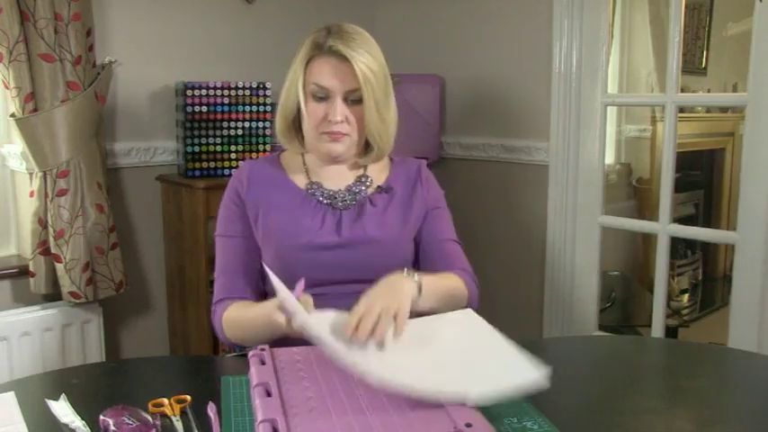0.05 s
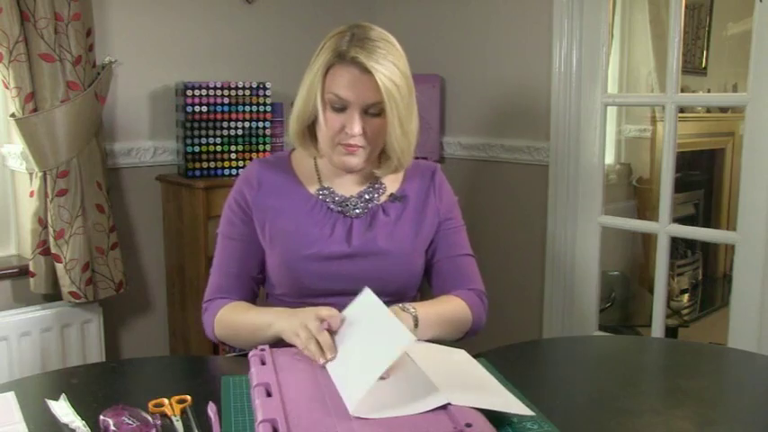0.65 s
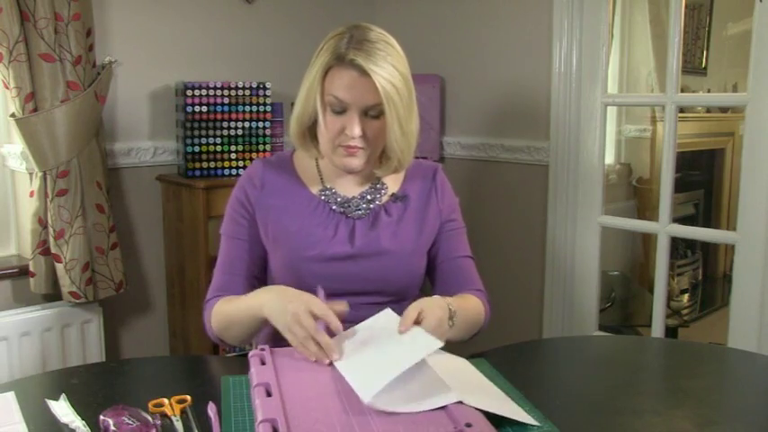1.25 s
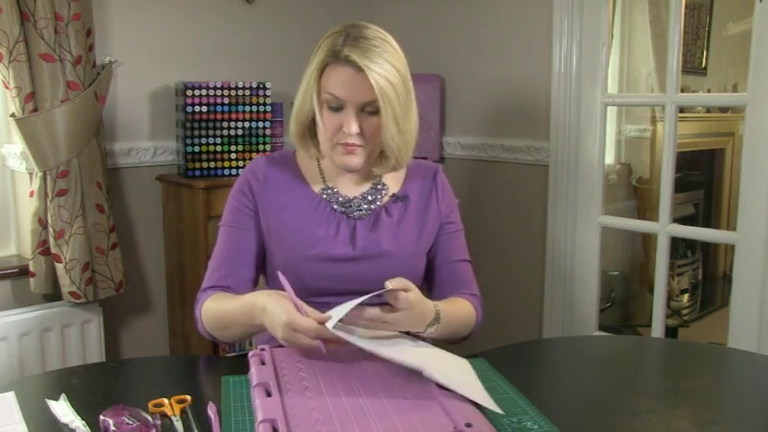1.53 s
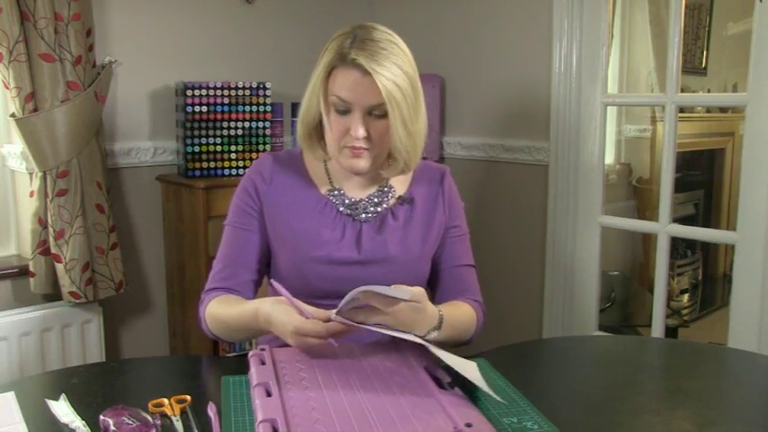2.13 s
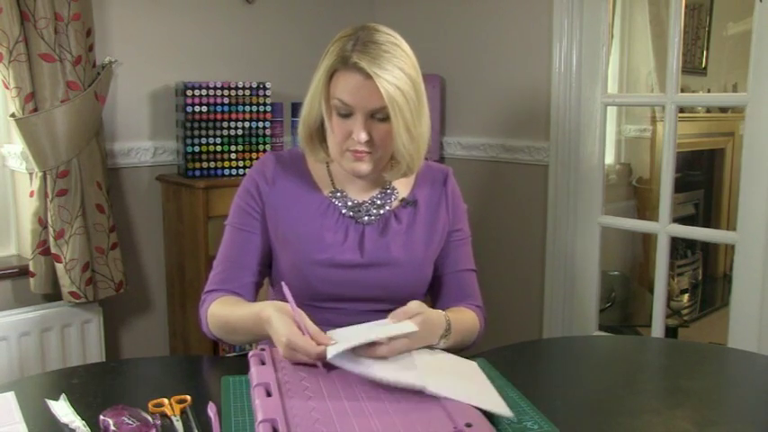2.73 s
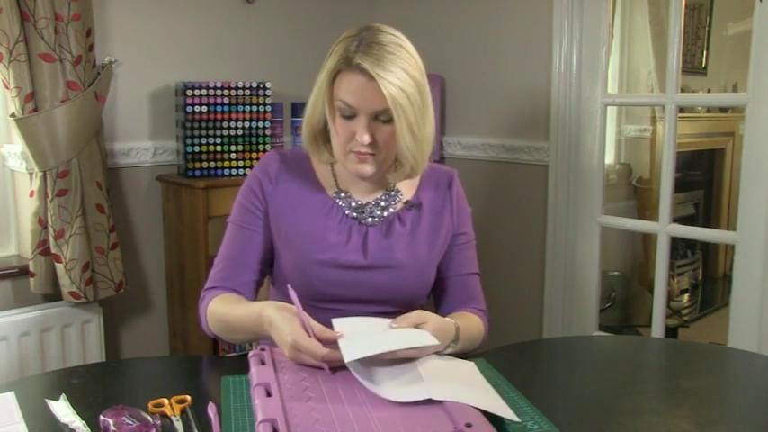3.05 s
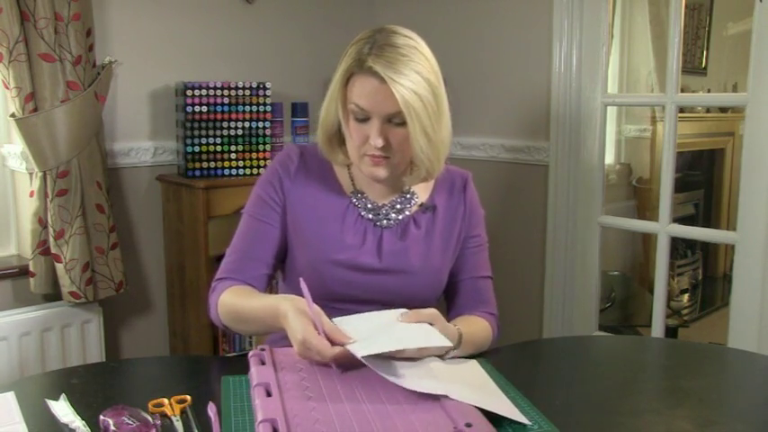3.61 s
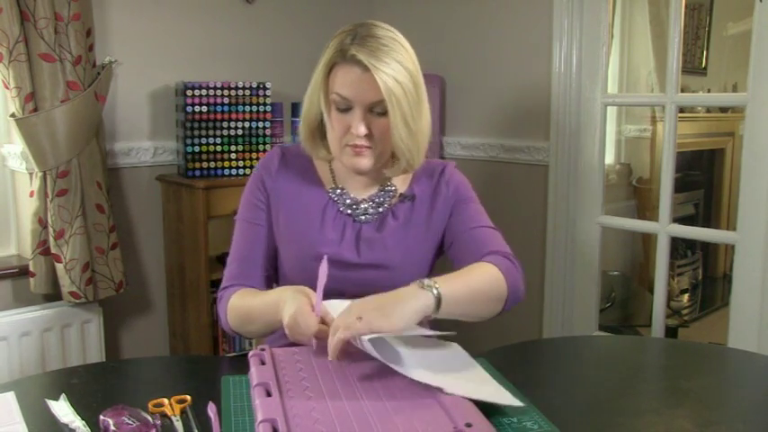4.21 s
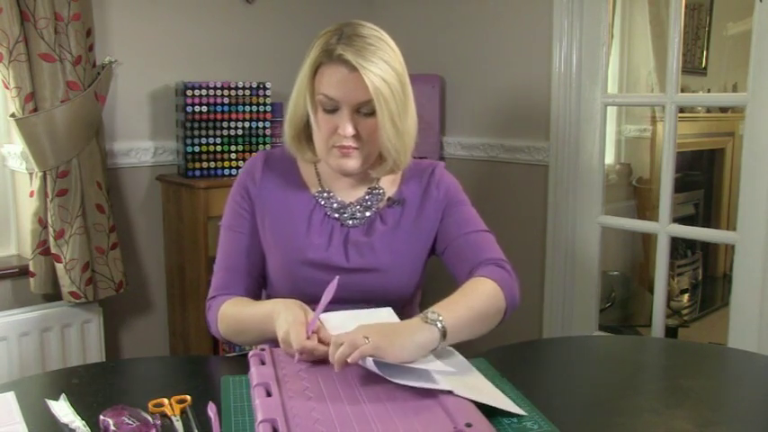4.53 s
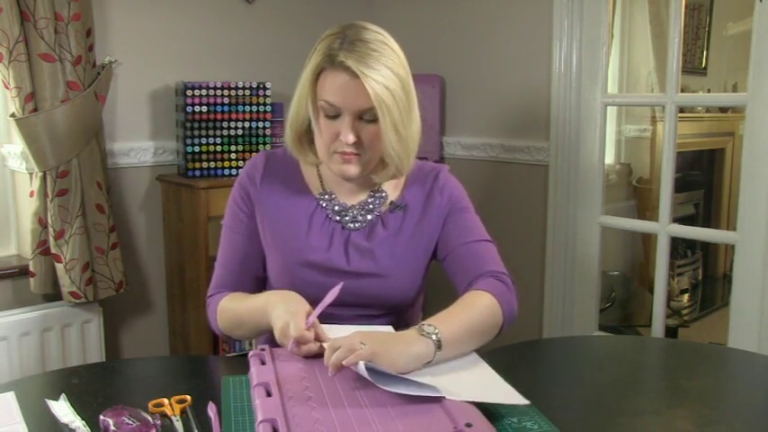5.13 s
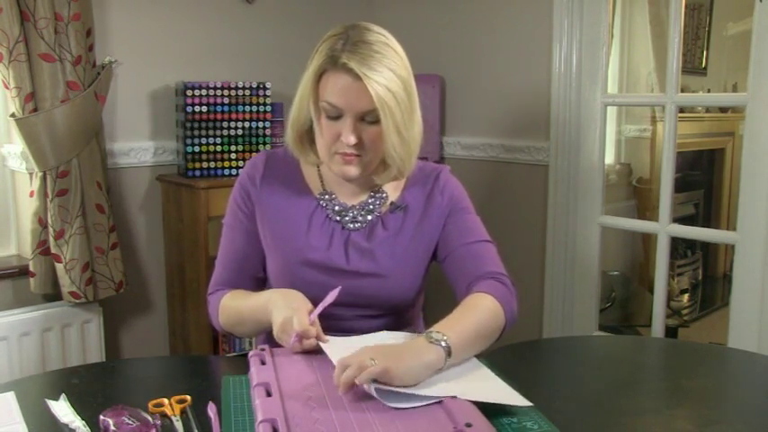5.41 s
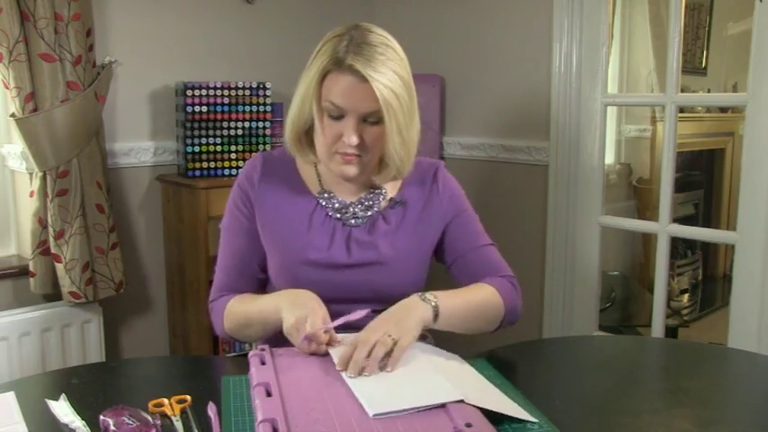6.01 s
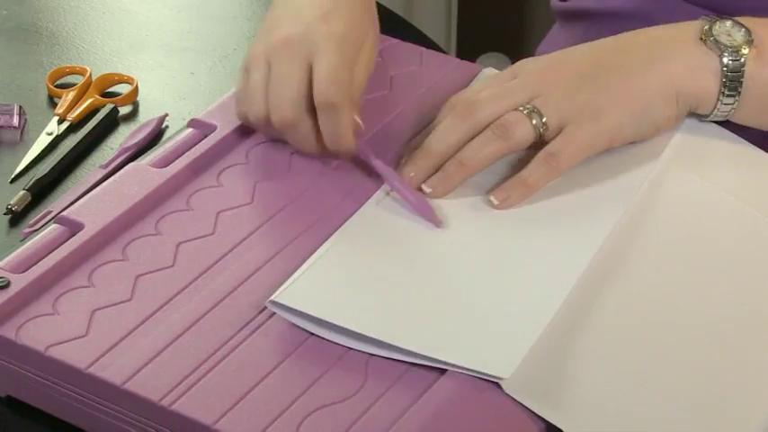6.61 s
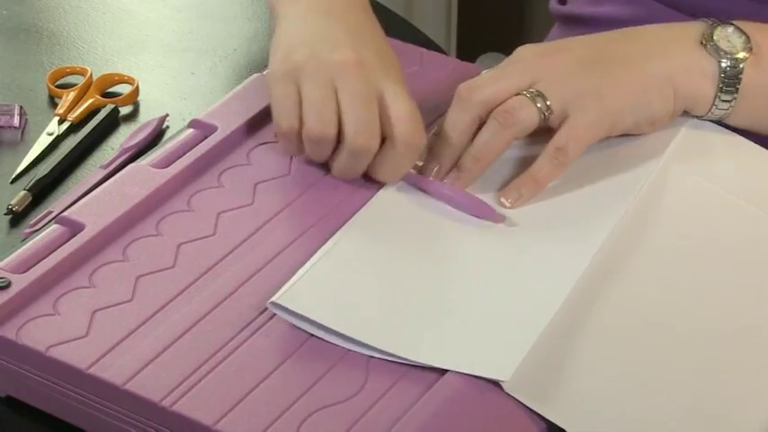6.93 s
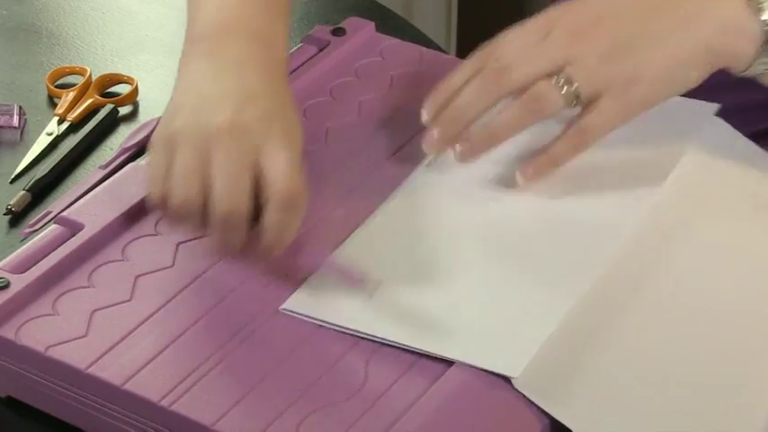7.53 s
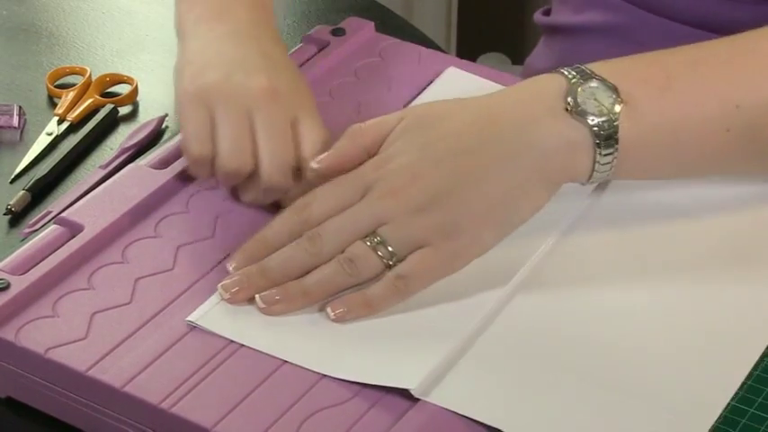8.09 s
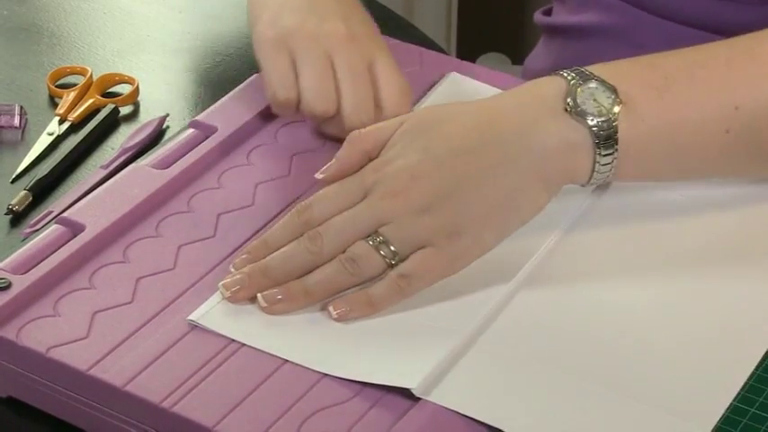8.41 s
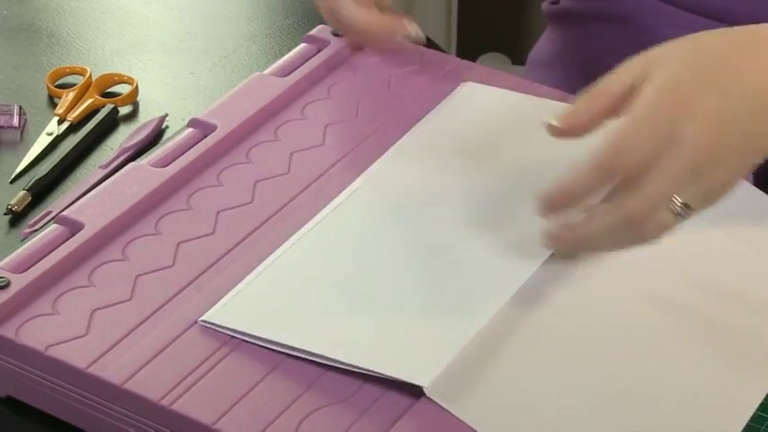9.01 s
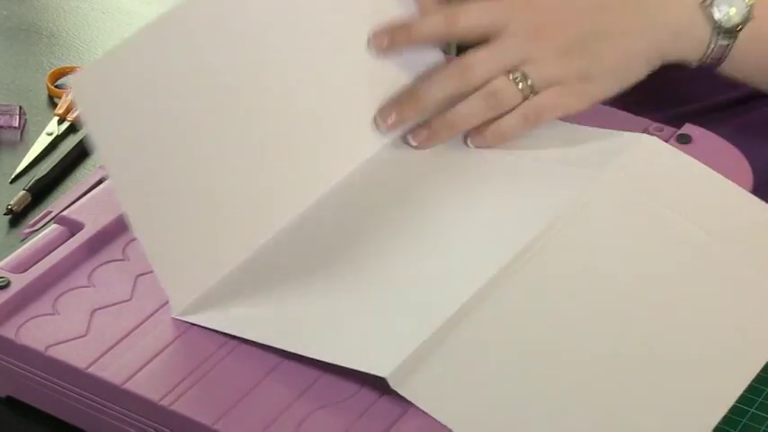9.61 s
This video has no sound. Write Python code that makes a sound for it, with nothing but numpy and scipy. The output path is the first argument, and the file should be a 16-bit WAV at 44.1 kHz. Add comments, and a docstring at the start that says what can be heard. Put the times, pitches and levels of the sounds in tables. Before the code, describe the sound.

A large sheet of stiff paper flops onto a plastic board with a low wobble. It rustles, ticks and hisses as it is bent over and lined up, with dull taps against the board. A plastic tool then rubs the crease in three strokes, a palm brushing the fold after the first, and slips off with a sharp clack. The sheet flexes again. It is heard close up in a small, quiet room.

```python
"""Folding and creasing stiff card

A large sheet is laid on a plastic scoring board, bent over and lined up in a small living room.
It rumbles as it flexes, rustles and ticks as it bends, hisses as it slides and flops on the board.
A plastic folding tool rubs the crease down in three strokes and slips off the edge with a clack;
a palm brushes the fold after the first. Rubs are tiny slips of fibres, hits are a push and a dying
chatter, and all of them ring the board. Close up, in mono."""
import sys
import numpy as np
from scipy import signal
from scipy.fft import rfft, irfft, next_fast_len
from scipy.io import wavfile
from scipy.ndimage import uniform_filter1d, map_coordinates

SR = 44100
rng = np.random.default_rng(int(sys.argv[2]) if len(sys.argv) > 2 else 0)


def transcribe(u):
    """Save the signal u as a 16-bit wav file named by the first command-line argument.

    u: samples, shape (n,) or (channels, n), limited to [-1, 1]; the rate is SR.
    q: integer samples, one column per channel.
    """
    v = np.clip(np.atleast_2d(u).T, -1, 1)
    q = np.round(v * 32767).astype(np.int16)
    wavfile.write(sys.argv[1], SR, q)


N = 430107
TOP_HZ = 15850


def amp(db):
    """Decibels to gain."""
    return 10 ** (np.asarray(db) / 20)


def unit(x):
    """Scale to rms 1."""
    return x / np.sqrt(np.mean(x ** 2) + 1e-20)


def along(points, hz):
    """Read (Hz, value) points on a log frequency axis."""
    freqs, values = np.transpose(points)
    return np.interp(np.log(hz + 1), np.log(freqs + 1), values)


def below(hz, edge_hz, order=3):
    """Low-pass gain."""
    return 1 / np.sqrt(1 + (hz / edge_hz) ** (2 * order))


def above(hz, edge_hz, order=3):
    """High-pass gain."""
    return below(edge_hz, hz + 1, order)


def add(track, s, x):
    """Mix x into the track at s seconds."""
    part = track[max(round(s * SR), 0):][:len(x)]
    part += x[:len(part)]


def filtered(x, response):
    """EQ a whole track with a frequency response."""
    size = next_fast_len(N + SR // 2)
    return irfft(rfft(x, size) * response(np.fft.rfftfreq(size, 1 / SR)), size)[:N]


def coloured(x, gain, size=4096):
    """Minimum-phase EQ, so that attacks stay sharp."""
    cepstrum = irfft(np.log(np.maximum(gain(np.fft.rfftfreq(size, 1 / SR)), 1e-6)))
    cepstrum[1:size // 2] *= 2
    cepstrum[size // 2 + 1:] = 0
    return signal.fftconvolve(x, irfft(np.exp(rfft(cepstrum))))[:len(x)]


def drift(rate):
    """A smooth random curve with rate knots a second."""
    knots = rng.standard_normal(int(N * rate / SR) + 4)
    return map_coordinates(knots, [np.arange(N) * rate / SR])


def arch(length, crest, power):
    """A hand's stroke: it gathers speed up to the crest, then slows to a stop."""
    progress = np.linspace(0, 1, round(length * SR))
    ramp = np.interp(progress, [0, np.clip(crest, 0.05, 0.95), 1], [0, 1, 0])
    return np.sin(np.pi / 2 * ramp) ** abs(power)


def friction(gain, rate, spread_db, smooth):
    """Fibres catch and let go: about rate uneven slips a second over a smooth rub, rms 1."""
    slips = (rng.random(N) < rate / SR) * rng.choice([-1, 1], N)
    sizes = amp(spread_db * np.clip(rng.standard_normal(N), -2, 2))
    return unit(coloured(unit(slips * sizes) + smooth * rng.standard_normal(N), gain))


def contact(t60, chatter):
    """One push, followed by a dying chatter of the card against its support."""
    t = np.arange(SR // 4) / SR
    tail = rng.standard_normal(len(t)) * amp(-60 * t / max(t60, .003))
    return (t == 0) + chatter * tail / np.linalg.norm(tail)


def patchy(x, depth_db, bands=5, frames=12):
    """As the sheet bends its resonances shift: patches of random gain in time and frequency."""
    spectra = signal.stft(x, nperseg=512)[2]
    patches = uniform_filter1d(rng.standard_normal(spectra.shape), bands, axis=0)
    patches = uniform_filter1d(patches, frames, axis=1)
    return unit(signal.istft(spectra * amp(depth_db * unit(patches)), nperseg=512)[1][:N])


def spot(depth_db, count=30):
    """A random EQ: each spot on the sheet favours its own resonances."""
    points = np.transpose([np.geomspace(200, TOP_HZ, count), rng.standard_normal(count)])
    return lambda hz: amp(depth_db * along(points, hz))


# Colour of the still room: (frequency [Hz], level [dB])
ROOM_TONE = [(15, -15), (25, 6), (144, -6.5), (204, -5), (340, -4), (537, -11.5), (666, -3), (762, -16),
             (2120, -20), (15500, -30.5)]
def room_tone():
    """A faint, steady bed of bass-heavy noise."""
    return amp(-63.5) * unit(filtered(rng.standard_normal(N), lambda hz: amp(along(ROOM_TONE, hz))))


# Colour of the handled sheet: (frequency [Hz], level [dB])
CARD_EQ = [(24, -28), (40, -0.5), (253, 1), (287, -7), (427, -0.5), (509, -4), (859, -1), (949, -2.5),
           (1130, -2), (1860, -11), (6810, -19), (15500, -29)]
def card(hz):
    """The sheet's voice, shared by its rumble, rustle and hiss."""
    return amp(along(CARD_EQ, hz))


# Wobbles of the whole sheet: (time [s], relative level [dB])
WOBBLES = [(0.005, -45), (0.16, -44.5), (0.28, -53), (0.93, -47.5), (1.37, -55), (1.62, -49.5), (1.8, -57),
           (2.15, -50.5), (2.9, -55), (4.1, -55), (4.29, -45.5), (5.02, -46.5), (5.16, -52), (5.9, -54),
           (7.27, -49), (7.83, -45), (8.94, -55), (9.59, -46), (9.67, -52)]
def flexing(bend, attack_s=0.01, t60=0.36):
    """The sheet rumbles with each wobble, and a little under every bend."""
    wobble, t = np.zeros(N), np.arange(SR // 2) / SR
    for s, db in WOBBLES:
        add(wobble, s - attack_s, np.minimum(t / attack_s, 1) * amp(db - 60 * t / t60))
    swell = np.hypot(wobble, amp(-9) * bend)
    rumble = friction(lambda hz: card(hz) * below(hz, 190, order=2), rate=60, spread_db=-4, smooth=1.17)
    return amp(-1.3) * swell * patchy(rumble, depth_db=-0.5, bands=2)


# Dull blows of card, fingers and tool on the board:
# (time [s], relative level [dB], centre [Hz], t60 [s], thud against the blow [dB])
KNOCKS = [(0.108, -26, 710, 0.19, -16), (0.388, -46.5, 557, 0.036, -22), (0.851, -38.5, 496, 0.21, -9),
          (1.172, -36.5, 397, 0.14, -7), (1.362, -34.5, 227, 0.12, -9), (2.129, -36, 241, 0.06, -20),
          (2.371, -38.5, 422, 0.057, -10), (2.519, -36.5, 327, 0.1, 1), (2.703, -28, 650, 0.018, -19),
          (2.766, -28, 960, 0.05, -5), (2.782, -21.5, 910, 0.025, -6.5), (2.895, -45.5, 199, 0.08, -13),
          (3.06, -36, 450, 0.12, -13), (3.751, -21.5, 840, 0.041, 5.5), (3.802, -23, 750, 0.097, -5),
          (3.812, -15, 930, 0.072, -13), (4.551, -34.5, 228, 0.065, -15), (4.618, -28, 424, 0.092, -2),
          (5.018, -36, 463, 0.041, -28), (6.165, -23.5, 594, 0.12, -19.5), (7.453, -17, 699, 0.14, -22),
          (7.489, -26, 660, 0.1, -30), (7.817, -25.5, 560, 0.15, -23), (8.078, -30, 1150, 0.053, -11),
          (8.321, -33, 750, 0.08, -24), (8.712, -16, 650, 0.17, -23), (8.729, -10, 1430, 0.24, -23),
          (8.757, -12, 744, 0.1, -22.5), (9.558, -33, 393, 0.053, -4.5), (9.577, -32.5, 494, 0.16, -9)]
def knocks():
    """Soft, broad contacts ring a low resonance of sheet and board, and thud in the table."""
    out = np.zeros(N)
    for s, db, centre_hz, t60, thud_db in KNOCKS:
        hollow = lambda hz: 1 + 0.54 / (1 + (9 * (hz / centre_hz - 1)) ** 2)
        band = lambda hz: below(hz, 1.38 * centre_hz) * above(hz, 0.8 * centre_hz)
        edge = lambda hz: amp(-35) * above(hz, 2 * centre_hz) * below(hz, 5 * centre_hz)
        thud = lambda hz: amp(thud_db) * above(hz, 35) * below(hz, 360)
        colour = lambda hz: hollow(hz) * band(hz) + edge(hz) + thud(hz)
        knock = coloured(contact(t60, chatter=10.5), colour)
        add(out, s, amp(db + 18.5) * knock / np.linalg.norm(knock))
    return out


# Colour of a sharp card contact: (frequency [Hz], level [dB])
CRACK_EQ = [(60, -22.5), (250, -1.5), (500, 7.5), (1200, 5), (2000, -4), (3300, -6), (8000, -19),
            (15000, -32.5)]
def crack(tilt):
    """Colour of a sharp card click, tilted brighter or duller in dB per octave, with little bass."""
    return lambda hz: amp(along(CRACK_EQ, hz) + tilt * np.log2((hz + 100) / 1500)) * above(hz, 313)


# Sharp clicks and cracks of the card: (time [s], relative level [dB], tilt [dB/octave])
SNAPS = [(0.109, -23, -4.5), (0.163, -27.5, 2), (0.184, -28, 5.5), (0.455, -45, -6), (0.48, -39, -4.5),
         (0.679, -37, -4), (0.85, -24.5, -0.5), (1.17, -34.5, 4), (1.3, -33, -1.5), (1.554, -35.5, 2),
         (1.599, -28, 2.5), (1.632, -29.5, -3), (2.062, -36, -4.5), (2.252, -30.5, -1), (2.335, -37.5, 0),
         (2.369, -30, 0), (2.455, -37.5, 3), (2.517, -29, -1), (2.524, -27, 0), (2.697, -25.5, -1),
         (2.738, -23, -2), (2.782, -25, 3.5), (3.191, -33, 0.5), (3.432, -46.5, 5), (3.571, -33.5, -1),
         (3.817, -13.5, -2.5), (3.907, -30, -2), (3.989, -29, 1.5), (4.047, -29, 1.5), (4.1, -33.5, 1.5),
         (4.18, -36.5, -6), (4.238, -32.5, -0.5), (4.42, -37, 2.5), (4.455, -31.5, 0), (4.618, -27, -5),
         (4.849, -28, 2.5), (4.965, -34, 1.5), (5.143, -35.5, 3.5), (5.159, -31.5, 3.5), (5.395, -29.5, 1),
         (5.415, -29.5, 3), (6.162, -26.5, 5.5), (6.621, -40.5, 0), (6.657, -32.5, 2.5), (7.846, -31, 5.5),
         (8.078, -21.5, 0.5), (8.727, -15.5, 4.5), (8.736, -14.5, 2.5), (8.755, -14.5, -4.5),
         (9.139, -40, 4), (9.32, -35.5, -0.5), (9.557, -31, 3.5), (9.681, -31.5, -3.5)]
def snaps():
    """Edges click on the board and the bent card buckles."""
    out = np.zeros(N)
    for s, db, tilt in SNAPS:
        place = spot(depth_db=3)
        # a light tick buckles only a small patch of card, which rings high
        light = np.clip((-23.5 - db) / 12, 0, 1)
        presence = lambda hz: 1 + 0.81 * light / (1 + (2 * np.log2((hz + 1) / 3000)) ** 2)
        colour = lambda hz: crack(tilt)(hz) * place(hz) * presence(hz)
        snap = coloured(contact(t60=0.028, chatter=1.27), colour)
        add(out, s, amp(db + 11.5) * snap / np.linalg.norm(snap))
    return out


# The hands bend the card: (start [s], length [s], relative level [dB])
BENDS = [(0.13, 0.15, -54), (0.681, 0.12, -64), (0.853, 0.07, -50), (0.977, 0.09, -58), (1.164, 0.1, -55.5),
         (1.344, 0.13, -52), (1.548, 0.1, -52), (1.738, 0.26, -58), (2.026, 0.07, -51), (2.157, 0.02, -55),
         (2.363, 0.05, -55), (2.509, 0.04, -54), (2.704, 0.2, -57), (3.021, 0.1, -55), (3.19, 0.06, -50),
         (3.338, 0.03, -62), (3.454, 0.05, -59), (3.58, 0.15, -55), (3.879, 0.2, -52), (4.13, 0.19, -51),
         (4.461, 0.12, -55), (4.639, 0.08, -49), (4.881, 0.14, -57), (5.165, 0.11, -53), (5.394, 0.15, -52),
         (5.682, 0.14, -54), (5.847, 0.1, -59), (6.043, 0.18, -58), (6.522, 0.05, -64.5),
         (6.651, 0.04, -56), (6.816, 0.08, -59.5), (7.535, 0.09, -51), (7.821, 0.07, -51), (8.1, 0.22, -50),
         (8.832, 0.12, -56), (9.156, 0.05, -51), (9.286, 0.07, -54), (9.439, 0.08, -52), (9.572, 0.18, -51)]
def bend_envelope(attack_s=0.022, sag_db=3.5, t60=0.26):
    """Each bend takes hold quickly, eases off as the card yields, then dies away."""
    out = np.full(N, amp(-68))  # the sheet stirs faintly even when merely held
    for s, length, db in BENDS:
        t = np.arange(round((length + t60) * SR)) / SR - attack_s
        fall_db = sag_db * np.clip(t / length, 0, 1) + 60 * np.maximum(t - length, 0) / t60
        add(out, s - attack_s, np.minimum(1 + t / attack_s, 1) * amp(db - fall_db))
    return out


def rustling(bend):
    """Bending card gives a grainy midrange rustle."""
    mids = lambda hz: card(hz) * above(hz, 286) * below(hz, 3400)
    rustle = friction(mids, rate=220, spread_db=6.5, smooth=1.14)
    return amp(-1.9) * bend * patchy(rustle, depth_db=3.5)


def crinkles(bend, count=150):
    """Small dry ticks break out at random, denser and louder the harder the card is bent."""
    out, chance = np.zeros(N), np.cumsum(bend)
    for when, size in rng.random((count, 2)):
        onset = np.searchsorted(chance, when * chance[-1])
        place = spot(depth_db=4.0)
        tick = coloured(contact(t60=0.029, chatter=1.3), lambda hz: crack(tilt=2.2)(hz) * place(hz))
        add(out, onset / SR, amp(18.0 + 10 * size ** 2) * bend[onset] * tick / np.linalg.norm(tick))
    return out


# Quick swishes of card over the board, and at 8.59 s a bright burst of the tool's hiss in the third stroke: #
# (peak time [s], level [dB], time to rise 20 dB [s], t60 [s], tilt [dB/octave])
SWEEPS = [(0.18, -36.5, 0.022, 0.22, 0), (0.935, -50.5, 0.066, 0.091, 3), (2.115, -51, 0.018, 0.028, 3.5),
          (2.785, -34.5, 0.086, 0.083, -3), (3.825, -40.5, 0.0061, 0.27, -2.5),
          (6.161, -35.5, 0.021, 0.091, 3), (8.59, -44, 0.032, 0.29, 7), (8.74, -20.5, 0.028, 0.16, -1),
          (8.767, -29, 0.01, 0.14, -1.5)]
def sweeps():
    """A sudden slide swells, then dies as the card settles."""
    out, t = np.zeros(N), np.arange(N) / SR
    for s, db, rise, t60, tilt in SWEEPS:
        swell = amp(db - 20 * np.maximum(s - t, 0) / rise - 60 * np.maximum(t - s, 0) / t60)
        out += swell * friction(crack(tilt), rate=1000, spread_db=7.5, smooth=0.92)
    return out


# Card slides over card or board: (start [s], length [s], relative level [dB])
SLIDES = [(0.786, 0.33, -59.5), (1.133, 0.46, -64.5), (1.557, 0.12, -61), (1.677, 0.37, -66.5),
          (2.336, 0.15, -62.5), (2.644, 0.3, -56.5), (2.973, 0.11, -62), (3.092, 0.11, -62),
          (3.178, 0.094, -57), (3.56, 0.42, -57.5), (3.907, 0.56, -66), (4.45, 0.19, -56),
          (4.64, 0.1, -63.5), (4.848, 0.15, -59), (5.126, 0.16, -55.5), (5.376, 0.26, -53.5),
          (5.624, 0.26, -62.5), (6.01, 0.11, -60.5), (6.283, 0.09, -69.5), (6.6, 0.29, -68),
          (7.561, 0.06, -56), (7.626, 0.43, -66.5), (8.12, 0.22, -59), (9.117, 0.36, -66.5),
          (9.403, 0.72, -63.5)]
def sliding():
    """Each slide hisses in one arch of speed; faster is brighter as well as louder."""
    swell = np.zeros(N)
    for s, length, db in SLIDES:
        add(swell, s, amp(db) * arch(length, crest=0.36, power=0.5))
    highs = lambda hz: card(hz) * above(hz, 2450) * below(hz, 6600, order=1)
    hiss = patchy(friction(highs, rate=460, spread_db=5.0, smooth=1.74), depth_db=3.0, bands=9)
    top_end = lambda hz: above(hz, 5800) * below(hz, 5400, order=1)
    air = friction(top_end, rate=2200, spread_db=10, smooth=1.3)
    speed = np.minimum(swell / amp(-50.5), 1) ** 0.22
    return swell * (amp(-1.2) * hiss + amp(-4.0) * speed * air)


# Body of the tool's scrape: (frequency [Hz], level [dB])
SCRAPE_EQ = [(59, -48), (100, -31), (134, -7), (253, -15.5), (420, -3), (487, -9.5), (564, 4.5), (791, 0),
             (1210, -4.5), (2750, -25), (4560, -27.5), (9950, -35.5), (15500, -46)]
# Sheen of the tool on card: (frequency [Hz], level [dB])
TOOL_HISS_EQ = [(1500, -8), (2800, -3), (4600, 0), (6800, -6.5), (10500, -6.5), (12500, -13.5),
                (15500, -17)]
# Tool strokes along the crease:
# (start [s], length [s], crest [0-1], peakedness [exponent], relative scrape [dB], relative hiss [dB])
STROKES = [(7.012, 0.46, 0.45, 1.04, -37, -50.5), (8.094, 0.18, 0.62, 2.4, -33.5, -59),
           (8.312, 0.36, 0.72, 0.45, -31.5, -53)]
def creasing():
    """The tool judders along the fold: coarse slips drive the board, fine ones hiss."""
    press, hiss_swell = np.zeros((2, N))
    for s, length, crest, power, scrape_db, hiss_db in STROKES:
        speed = arch(length, crest, power)
        add(press, s, amp(scrape_db) * speed)
        add(hiss_swell, s, amp(hiss_db) * speed ** 1.9)  # hiss grows faster with speed than scrape
    body = lambda hz: amp(along(SCRAPE_EQ, hz))
    dark = lambda hz: body(hz) * below(hz, 650, order=1) * below(hz, 2400)
    bright = lambda hz: body(hz) * above(hz, 640, order=1) * above(hz, 390) * below(hz, 2660)
    sheen = lambda hz: amp(along(TOOL_HISS_EQ, hz)) * above(hz, 1200)
    soft = friction(dark, rate=1000, spread_db=2.5, smooth=1.9)
    firm = friction(bright, rate=900, spread_db=6.5, smooth=0.99)
    hiss = friction(sheen, rate=2500, spread_db=4, smooth=0.96)
    # a light stroke only stirs the low resonances; a harder one reaches higher
    hardness = np.minimum(press / amp(-31.5), 1) ** 0.64
    scrape = np.sqrt(1 - hardness ** 2) * soft + hardness * firm
    judder = amp(2.0 * drift(rate=49))
    return judder * (amp(-2.36) * press * scrape + amp(1.3) * hiss_swell * hiss)


# Colour of skin on card: (frequency [Hz], level [dB])
PALM_EQ = [(200, -16), (1000, 2.5), (2400, -5), (4000, -2), (5500, -8.5), (9000, -14), (15500, -23)]
def palm(start_s=7.86, length_s=0.23):
    """The flat hand brushes along the fold: a soft swish with hardly any grit."""
    swell = np.zeros(N)
    add(swell, start_s, amp(-46.5) * arch(length_s, crest=0.42, power=1.0))
    return swell * friction(lambda hz: amp(along(PALM_EQ, hz)), rate=3000, spread_db=1.5, smooth=2.4)


# Resonances of the board under the card: (centre [Hz], width [Hz], level against the direct sound [dB])
BOARD_MODES = [(321, 55, -7), (437, 23.3, 2.5), (560, 22, -6), (677, 14, -1), (840, 80, -4.5),
               (1153, 22, -4.5), (1232, 8.8, -4), (1588, 14, -3), (1804, 25, -10.5), (2200, 5.7, -8),
               (2650, 350, -29), (3990, 960, -13.5)]
def board(x):
    """Every contact also rings the board, with the mids gently scooped."""
    ring = lambda hz: sum(amp(db) * 1j * hz * width / (centre ** 2 - hz ** 2 + 1j * hz * width)
                          for centre, width, db in BOARD_MODES)
    scoop_db = [(200, 0.0), (450, -3.0), (900, -3.5), (2000, -1.0), (5000, 0.0)]
    return filtered(x, lambda hz: (1 + ring(hz)) * amp(along(scoop_db, hz)))


# Decay of the furnished room: (frequency [Hz], t60 [s])
ROOM_DECAY = [(150, 0.62), (500, 0.27), (2500, 0.23), (12000, 0.18)]
def reverb(x, blocks=40):
    """The room's short, diffuse echo, with a fresh random tail for each block; treble dies first."""
    out, predelay_s = np.zeros(N), 0.005
    for block in np.array_split(np.arange(N), blocks):
        hz, t, noise = signal.stft(rng.standard_normal(SR // 2), SR, nperseg=256)
        decay = amp(-60 * t / along(ROOM_DECAY, hz)[:, None])
        tail = signal.istft(noise * decay, SR, nperseg=256)[1]
        add(out, block[0] / SR + predelay_s, signal.fftconvolve(x[block], tail / np.linalg.norm(tail)))
    return out


def scene():
    """Card, hand and tool on the board, with reverb and room tone; alike in both channels."""
    bend = bend_envelope()
    grip = amp(2.3 * drift(rate=45))  # the fingers never hold quite steady
    handling = flexing(bend) + grip * (rustling(bend) + sliding())
    direct = board(handling + knocks() + snaps() + crinkles(bend) + sweeps() + creasing() + palm())
    return np.tile(direct + amp(-11.0) * reverb(direct) + room_tone(), (2, 1))


def record(dry):
    """A brick-wall high cut at TOP_HZ."""
    return np.array([filtered(channel, lambda hz: hz < TOP_HZ) for channel in dry])


dry = scene()
out = record(dry)
transcribe(out)
```